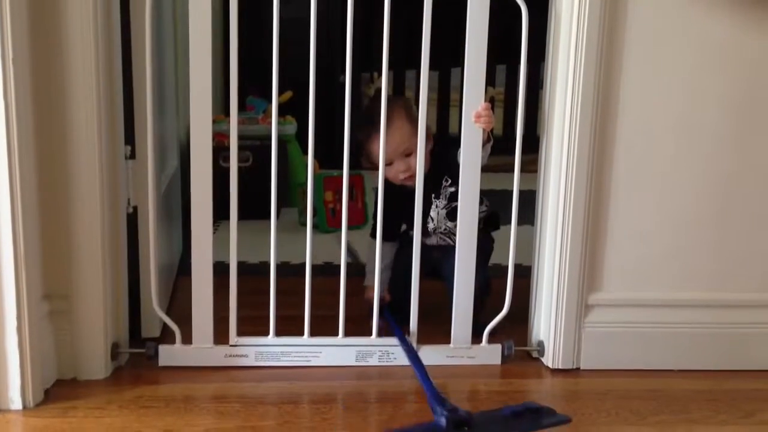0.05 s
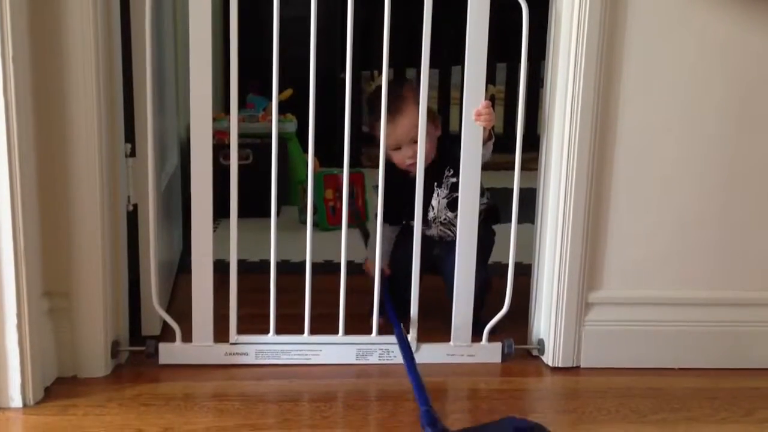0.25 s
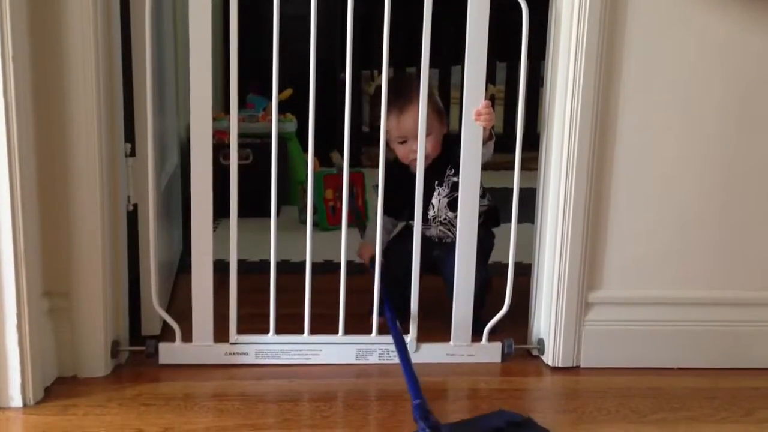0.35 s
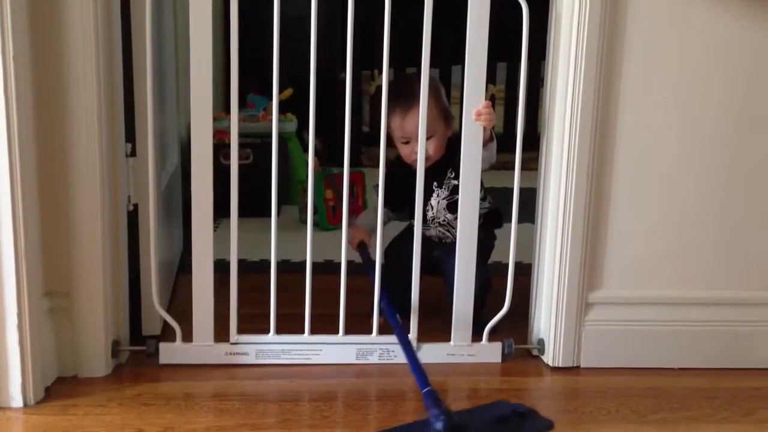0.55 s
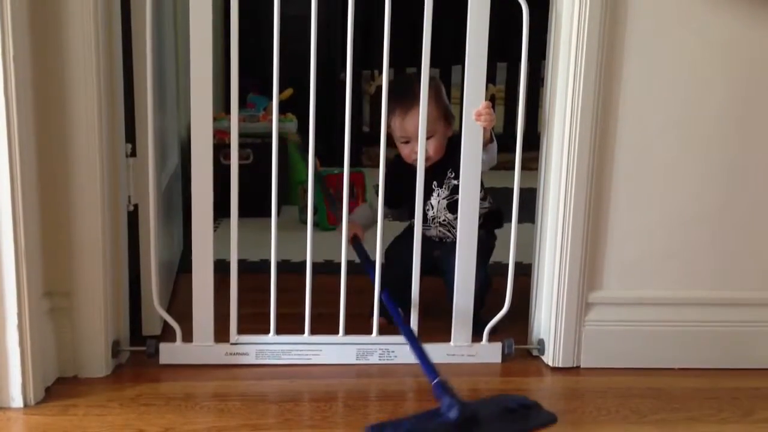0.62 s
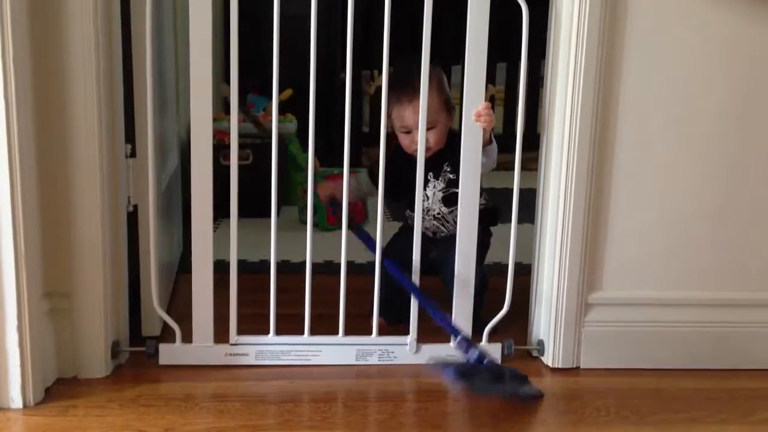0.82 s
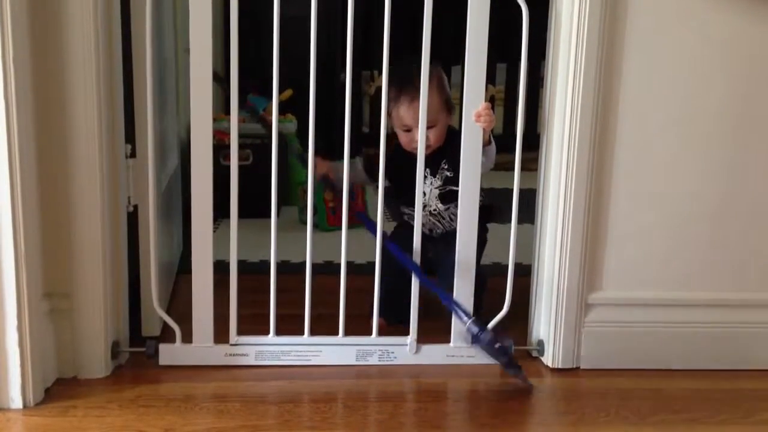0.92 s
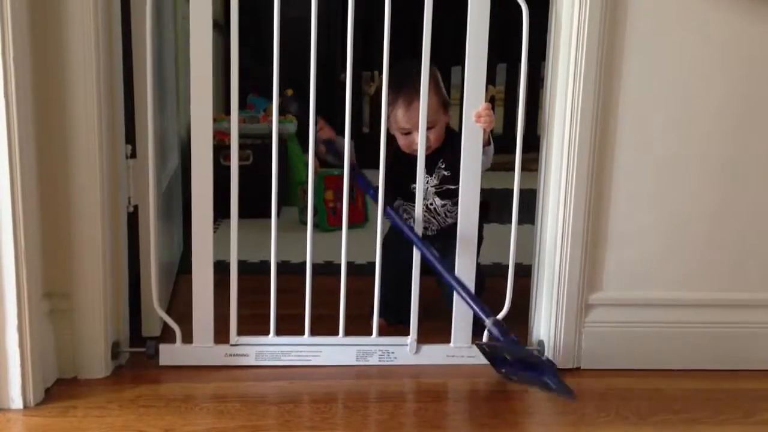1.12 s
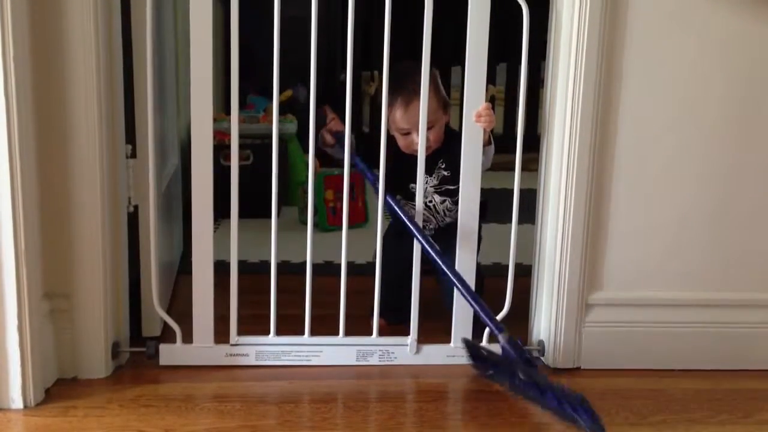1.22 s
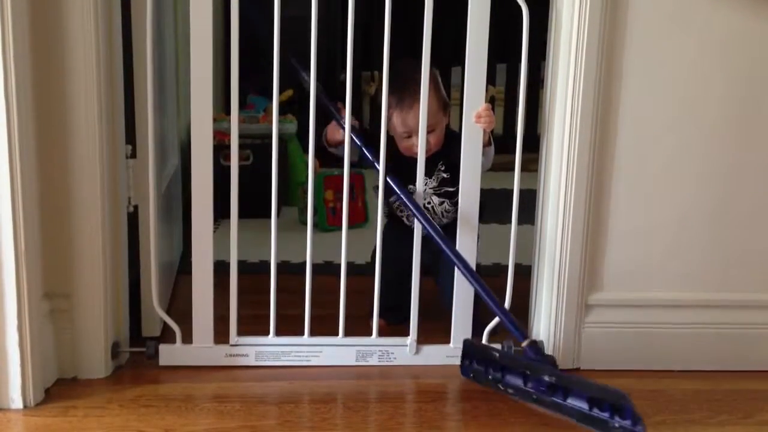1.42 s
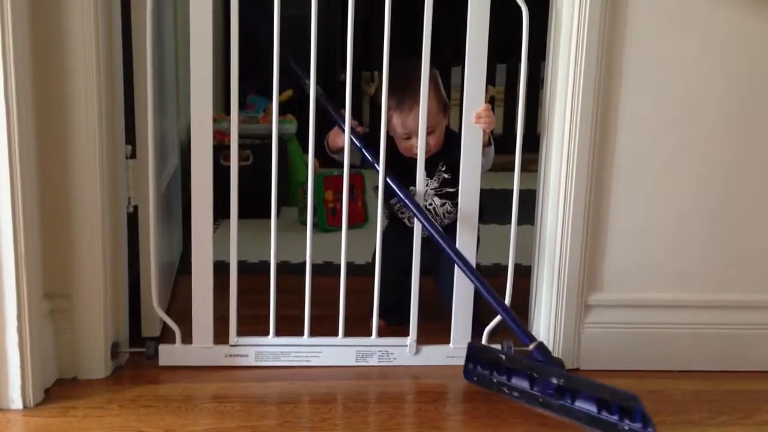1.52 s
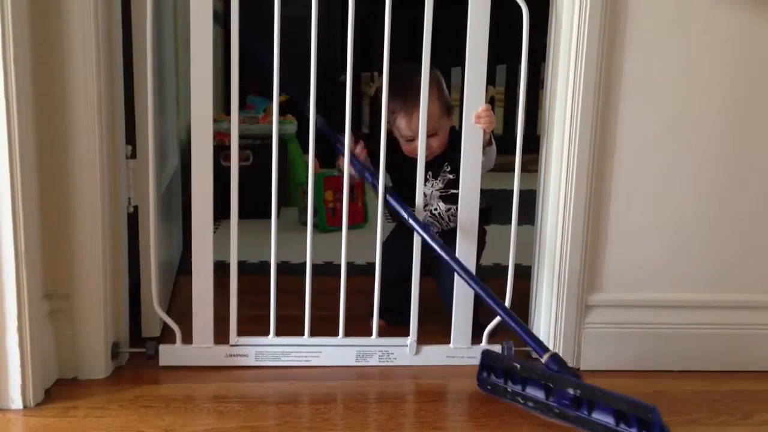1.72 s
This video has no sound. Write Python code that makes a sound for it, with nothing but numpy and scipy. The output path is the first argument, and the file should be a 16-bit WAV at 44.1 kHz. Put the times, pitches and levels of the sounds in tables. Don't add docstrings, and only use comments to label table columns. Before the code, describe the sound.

A mop clatters through a metal gate: head ticks and slaps on wooden floor, handle taps a bar, knocks the frame, then cracks hard on the sill; faint scraping, bare echoing hallway, phone microphone.

```python
import sys
import numpy as np
from scipy import signal
from scipy.fft import rfft, irfft
from scipy.io import wavfile
from scipy.ndimage import uniform_filter1d

SR = 44100
rng = np.random.default_rng(int(sys.argv[2]) if len(sys.argv) > 2 else 0)


def attenuation_scalar(level_db):
    decades = np.asarray(level_db, float) / 20
    return 10 ** decades


def store_pcm(level_fs):
    pcm = np.round(np.clip(level_fs, -1, 1) * 32767).astype(np.int16)
    wavfile.write(sys.argv[1], SR, np.atleast_2d(pcm).T)


N = 77175
t = np.arange(N) / SR
BODY_LOW_HZ = 135


def unit(x):
    return x / np.sqrt(np.mean(x ** 2))


def curve(hz, table):
    table = np.array(table, float)
    return np.interp(np.log(np.maximum(hz, 1)), np.log(table[:, 0]), table[:, 1])


def air():
    # [f/Hz, level per Hz/dB]
    hiss_colour = [(15, -79), (25, -75), (119, -0.5), (457, -12), (537, -12), (762, -16), (2490, -16),
                   (2700, -20), (15500, -26.5)]
    hiss_db, hum_db, hum_hz = -62, -67, 121
    waver = unit(uniform_filter1d(rng.standard_normal(N), size=3000))
    hum_phase = 2 * np.pi * hum_hz * t + 0.4 * np.roll(waver, N // 2)
    hum = attenuation_scalar(hum_db + 0.44 * waver) * np.sin(hum_phase)
    hz = np.arange(N // 2 + 1) * SR / N
    hiss = irfft(rfft(rng.standard_normal(N)) * attenuation_scalar(curve(hz, hiss_colour)), N)
    return attenuation_scalar(hiss_db) * unit(hiss) + hum


def ring(hz, db, t60):
    waver_db, waver_rad, changes_per_s = 4, .8, 45
    u = t[:SR * 3 // 4]
    place = u * changes_per_s
    settle_in = np.minimum(place / 2, 1)
    level, phase = (np.interp(place, np.arange(40), v) * settle_in for v in rng.standard_normal((2, 40)))
    fade = attenuation_scalar(db - 60 * u / t60 + waver_db * level)
    tone = fade * np.sin(2 * np.pi * hz * u + waver_rad * phase)
    return np.pad(tone, (0, N - len(u)))


def catches():
    # [t/s, f/Hz, level/dB, time to fade by 60 dB/s]
    catch_list = [(0.769, 2930, -50, 0.029), (0.82, 1720, -48, 0.025), (0.831, 2360, -54, 0.05),
                  (.909, 2300, -49, .03), (.922, 2440, -47, 0.015), (0.92, 420, -48.5, 0.095),
                  (0.961, 426, -51, 0.3), (0.987, 1000, -44, 0.033), (1.612, 433, -47.5, 0.063),
                  (1.743, 370, -45, 0.032), (0.55, 257, -50, 0.54), (1.531, 470, -45, 0.074),
                  (0.11, 540, -63, 0.77), (.01, 1300, -70.5, 0.7), (.03, 2300, -72.5, 1)]
    out = np.zeros(N)
    for s, hz, db, t60 in catch_list:
        out = out + np.roll(ring(hz, db, t60), int(s * SR)) * (t >= s)
    return out


def room(x, tilt_db=0):
    # [f/Hz, time/s]
    fade_times = [(125, 0.61), (250, 0.56), (500, 0.48), (1000, 0.47), (2000, 0.41), (4000, 0.38),
                  (8000, 0.34), (14000, 0.32)]
    delay_s, build_s = 0.0015, 0.0069
    u, tail = t[:SR * 3 // 5], 0
    noise = rng.standard_normal(len(u))
    for hz in 60 * 2. ** np.arange(0, 8.1, .5):
        band = signal.butter(2, [hz / 2 ** .25, hz * 2 ** .25], "band", fs=SR, output="sos")
        fade = attenuation_scalar(-60 * u / curve(hz, fade_times))
        tail = tail + signal.sosfilt(band, noise) * fade * attenuation_scalar(tilt_db * np.log2(hz / 1000))
    tail = tail * (1 - np.exp(-np.maximum(u - delay_s, 0) / build_s))
    return signal.fftconvolve(x, tail / np.sqrt(np.sum(tail ** 2)))[:N]


def squeaks():
    # [t/s, length/s, starting f/Hz, level/dB]
    squeak_list = [
        (.216, .014, 2600, -58),
        (1.3285, .009, 2750, -31),
    ]
    rise_hz_per_s = 40000
    out = np.zeros(N)
    for s, length, hz, db in squeak_list:
        late = t - s
        swell = np.sin(np.pi * np.clip(late / length, 0, 1))
        out = out + attenuation_scalar(db) * swell * np.sin(2 * np.pi * (hz + rise_hz_per_s * late / 2) * late)
    return out


def tint(x, table):
    size = 2048
    hz = np.arange(size // 2 + 1) * SR / size
    db = curve(hz, table) + 12 * np.log2(np.clip((hz + 1) / BODY_LOW_HZ, 0, 1))
    c = irfft(db * np.log(10) / 20)
    c[1:size // 2] *= 2
    c[size // 2 + 1:] = 0
    h = irfft(np.exp(rfft(c)))
    return signal.fftconvolve(x, h / np.sqrt(np.sum(h ** 2)))[:N]


def struck(blows, colour, modes, name):
    wet_db = dict(tick=-2.5, edge=-5, slap=-3.5, bar=-6, frame=5.5, tube=0, sill=-1.5)
    room_tilt = dict(tick=-3.5, edge=2.2, slap=0.3, bar=-0.2, frame=-0.23, tube=-3, sill=-0.5)
    contact_rise_ms, snap_ms = 0.19, 1
    ring_wet_db = -4
    crack, push = np.zeros(N), np.zeros(N)
    for s, db, ms, ring_db in blows:
        late = t - s
        late_ms = np.abs(late) * 1000
        rise = np.minimum(late_ms / min(ms, contact_rise_ms), 1)
        shape = attenuation_scalar(db) * (late >= 0) * np.exp(-late_ms / ms) * rise
        burst = shape * rng.standard_normal(N)
        kick = np.sqrt(np.sum(shape ** 2)) * (np.arange(N) == int(s * SR))
        contact = kick + 0.38 * burst if ms < snap_ms else burst
        crack = crack + contact + attenuation_scalar(wet_db[name]) * room(kick, room_tilt[name])
        push = push + (kick + 0.73 * burst) * attenuation_scalar(ring_db)
    body = sum((-1) ** k * ring(hz, db, t60) for k, (hz, db, t60) in enumerate(modes))
    rung = signal.fftconvolve(push, body / np.sqrt(np.sum(body ** 2)))[:N]
    rung = signal.sosfilt(signal.butter(2, BODY_LOW_HZ, "high", fs=SR, output="sos"), rung)
    return tint(crack, colour) + rung + attenuation_scalar(wet_db[name] + ring_wet_db) * room(rung)


def head_ticks():
    # [t/s, level/dB, chatter length/ms, ring share/dB]
    tick_blows = [
        (.2308, -29, 7.4, -9),
        (.2322, -26.5, 3.4, 0.5),
        (.2375, -24.5, 1.6, -7),
        (.244, -28, 7.1, -18),
    ]
    # [f/Hz, level/dB]
    tick_colour = [(59, -66), (100, -53), (293, 0.5), (614, -12.5), (879, -2.5), (2750, -6.5),
                   (7730, -14.5), (8410, -10.5), (15500, -34)]
    # [f/Hz, level/dB, time to fade by 60 dB/s]
    tick_modes = [(2750, 16, 0.02), (4770, 13.5, 0.019), (5100, 5, 0.013), (1410, -17, 0.014),
                  (855, -2, 0.11), (8770, 0, 0.012)]
    return struck(tick_blows, tick_colour, tick_modes, "tick")


def head_edge():
    # [t/s, level/dB, chatter length/ms, ring share/dB]
    edge_blows = [
        (.2555, -33, 1.4, -9),
        (.2572, -19.5, 5.6, 1),
    ]
    # [f/Hz, level/dB]
    edge_colour = [(100, -18), (300, -6), (700, -12), (1500, 0), (2500, -6.5), (4500, -13), (7000, -23),
                   (15500, -36)]
    # [f/Hz, level/dB, time to fade by 60 dB/s]
    edge_modes = [(1005, -3, 0.026), (1530, 1, .025), (1990, -6.5, 0.022), (2900, -13, 0.021),
                  (4550, -7.5, 0.013)]
    return struck(edge_blows, edge_colour, edge_modes, "edge")


def head_slap():
    # [t/s, level/dB, chatter length/ms, ring share/dB]
    slap_blows = [
        (.2675, -17.5, 2.7, -2),
        (.270, -16, 8.3, -6.5),
        (.280, -18.5, 2.3, -2),
        (.286, -23, 17.8, -9.5),
    ]
    # [f/Hz, level/dB]
    slap_colour = [(59, -57), (100, -35.5), (205, 2.5), (614, -12.5), (808, -10.5), (998, -3.5),
                   (3180, -21), (3690, -19.5), (15500, -61)]
    # [f/Hz, level/dB, time to fade by 60 dB/s]
    slap_modes = [(201, -2, 0.26), (290, -5, 0.13), (637, 3, 0.072), (933, -5.5, 0.63), (1001, 0.5, 0.082),
                  (1080, -3, 0.09), (1458, 1, 0.085), (1496, 2.5, 0.057), (1680, 0.5, 0.081),
                  (2123, 5.5, 0.057), (4300, -24, 0.0079)]
    return struck(slap_blows, slap_colour, slap_modes, "slap")


def handle_on_bar():
    # [t/s, level/dB, chatter length/ms, ring share/dB]
    bar_blows = [
        (.5065, -30.5, 1.5, -28),
        (.509, -26.5, 0.52, 14),
        (.5105, -31, 6.3, -9),
        (.518, -31.5, 35.2, -10.5),
    ]
    # [f/Hz, level/dB]
    bar_colour = [(140, -13.5), (260, -4), (790, -4.5), (1100, -11), (1600, -5.5), (2800, -8),
                  (4500, -11.5), (15500, -46.5)]
    # [f/Hz, level/dB, time to fade by 60 dB/s]
    bar_modes = [(266, -9, .25), (505, -13, .2), (775, -6, .15), (1437, -9, .08), (1723, -7, .07),
                 (3752, 0, .2), (2600, -9, .02), (3824, 0, .2), (5453, -11, .07), (3900, 4, .015),
                 (12400, -22, .025)]
    return struck(bar_blows, bar_colour, bar_modes, "bar")


def drag():
    # [t/s, level/dB]
    pressure = [
        (.55, -79),
        (.7, -62.5),
        (.78, -57.5),
        (.86, -60.5),
        (.93, -60),
        (.99, -59),
        (1.04, -62),
        (1.3, -52),
        (1.6, -72),
        (1.75, -61.5),
    ]
    # [f/Hz, level/dB]
    drag_colour = [(100, -23), (250, 4.5), (430, -4), (800, -7), (2200, -8), (4500, -10.5), (7000, -20),
                   (15500, -37)]
    grains_per_s, spread_db = 4000, 2.6
    chance, strength, side = rng.random((3, N))
    size = attenuation_scalar(-spread_db * np.log(1 - strength))
    grains = (chance < grains_per_s / SR) * size * np.sign(side - .5)
    return unit(tint(grains, drag_colour)) * attenuation_scalar(np.interp(t, *np.array(pressure).T, left=-120))


def handle_on_frame():
    # [t/s, level/dB, chatter length/ms, ring share/dB]
    frame_blows = [
        (1.068, -22.5, 8.2, 2.5),
        (1.074, -22, 0.87, -10),
        (1.082, -23, 1.14, 3.5),
        (1.091, -26.5, 2.7, -8),
        (1.101, -29, 6.9, -5.5),
    ]
    # [f/Hz, level/dB]
    frame_colour = [(59, -28), (100, -19.5), (403, -1.5), (861, -22), (936, -10.5), (1290, -13),
                    (1460, -14), (4750, -24), (15500, -62)]
    # [f/Hz, level/dB, time to fade by 60 dB/s]
    frame_modes = [(153.6, -12, 0.39), (250.6, -13, 0.15), (325, -12.5, 0.092), (377, -4.5, 0.16),
                   (415, 4.5, 0.2), (552, -7.5, 0.14), (667, -10.5, 0.13), (1044, -9.5, 0.042),
                   (1284, -1.5, 0.038), (2345, 2, 0.08)]
    return struck(frame_blows, frame_colour, frame_modes, "frame")


def tube_ring():
    # [t/s, level/dB, chatter length/ms, ring share/dB]
    tube_blows = [
        (1.1215, -29.5, 5.6, -2),
        (1.134, -31, 6.2, -16),
    ]
    # [f/Hz, level/dB]
    tube_colour = [(100, 0), (300, 9), (2000, 10.5), (4000, -3), (8000, -6.5), (12000, -15), (15500, -18)]
    # [f/Hz, level/dB, time to fade by 60 dB/s]
    tube_modes = [(3806, 0, .1), (6616, -12, .05), (3890, -1, .07), (8600, -13, .02), (10060, -17, .03),
                  (11200, -12, .012), (12300, -12, .03), (13600, -15, .012), (14940, -18, .02)]
    return struck(tube_blows, tube_colour, tube_modes, "tube")


def handle_on_sill():
    # [t/s, level/dB, chatter length/ms, ring share/dB]
    sill_blows = [
        (1.3372, -30.5, 1.7, 8.5),
        (1.3385, -10, 0.44, 7.5),
        (1.3402, -9.5, 0.25, 7.5),
        (1.3412, -17, 3.8, -5.5),
        (1.3423, -13, 0.32, 1),
        (1.3465, -25.5, 9.5, -1),
    ]
    # [f/Hz, level/dB]
    sill_colour = [(140, -12), (460, 7.5), (1000, -4), (2400, 0.5), (3500, -17), (5500, -15),
                   (10000, -29.5), (13000, -24.5), (15500, -36)]
    # [f/Hz, level/dB, time to fade by 60 dB/s]
    sill_modes = [(200, -24, .3), (468, -23, .18), (915, -6, .012), (1600, -4, .005), (2250, -2, .006),
                  (2700, -1, .007), (3290, -1, .006), (4500, -4, .005), (6000, -12, .004),
                  (8500, -16, .003)]
    return struck(sill_blows, sill_colour, sill_modes, "sill")


def ducked(floor, loud):
    set_in_db, depth, release_s = -35.5, 0.19, 0.5
    keep = np.exp(-1 / (release_s * SR))
    recent_power = signal.lfilter([1 - keep], [1, -keep], loud ** 2)
    return floor * (1 + recent_power / attenuation_scalar(2 * set_in_db)) ** -depth


def scene():
    blows = head_ticks() + head_edge() + head_slap() + handle_on_bar()
    blows = blows + handle_on_frame() + tube_ring() + handle_on_sill()
    scraping = catches() + drag()
    scraping = 0.96 * scraping + 0.79 * room(scraping)
    return (blows + scraping + squeaks() + ducked(air(), blows))[None]


def low_pass(x):
    return signal.sosfilt(signal.butter(12, 16480, fs=SR, output="sos"), x)


def record(dry):
    x = signal.sosfilt(signal.butter(1, 61.4, "high", fs=SR, output="sos"), dry)
    x = signal.sosfilt(signal.ellip(8, .3, 50, 15400, fs=SR, output="sos"), x)
    return low_pass(x)


dry = scene()
out = record(dry)
store_pcm(out)
```